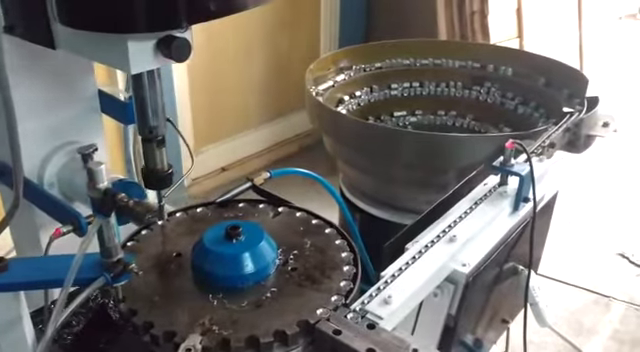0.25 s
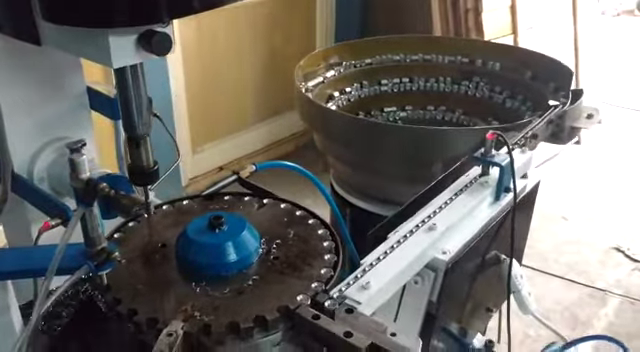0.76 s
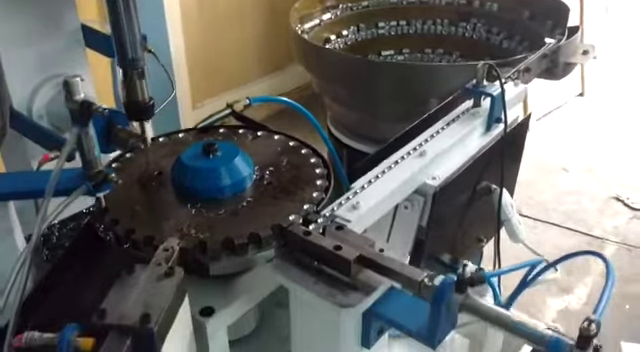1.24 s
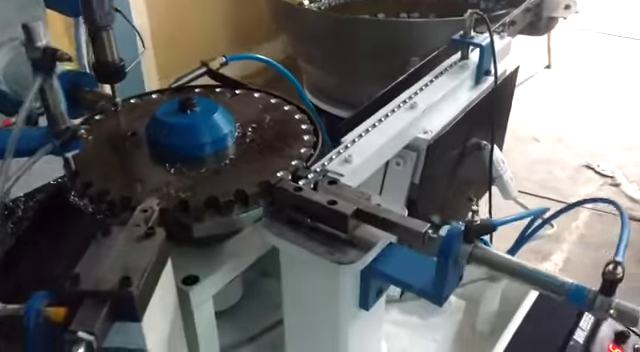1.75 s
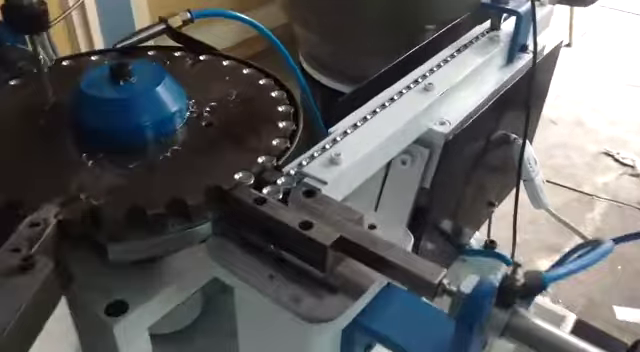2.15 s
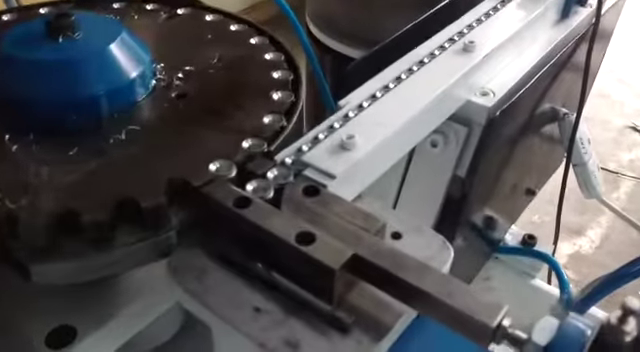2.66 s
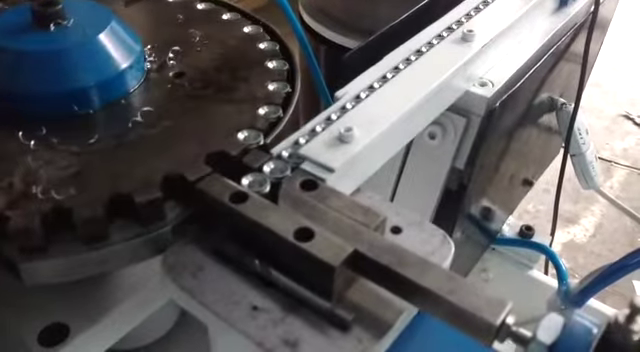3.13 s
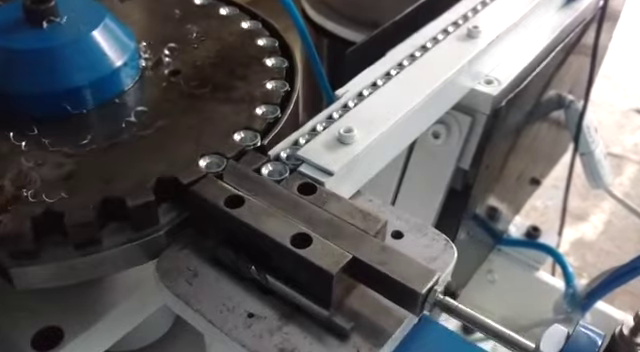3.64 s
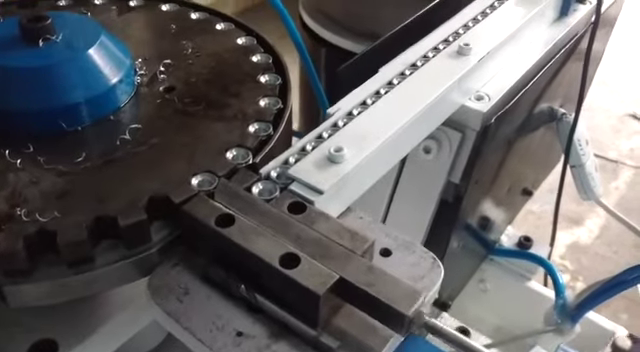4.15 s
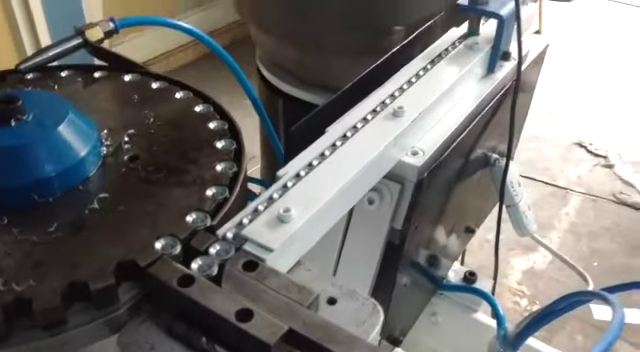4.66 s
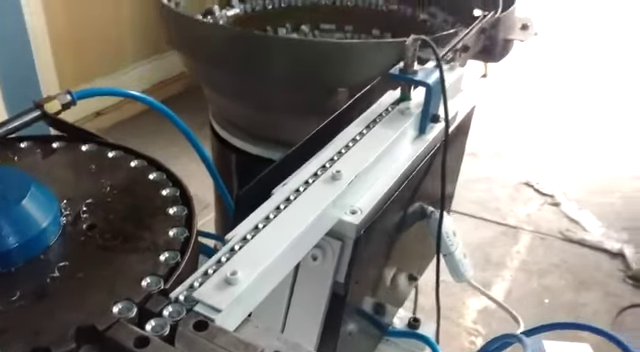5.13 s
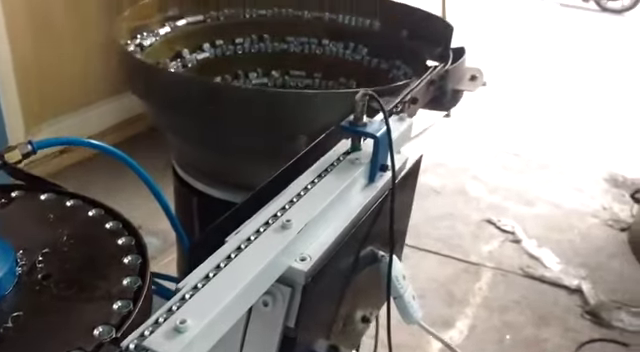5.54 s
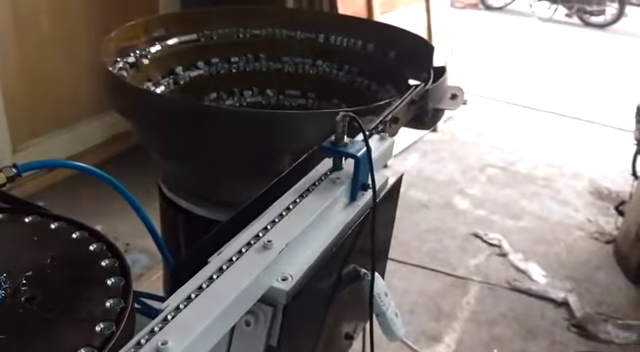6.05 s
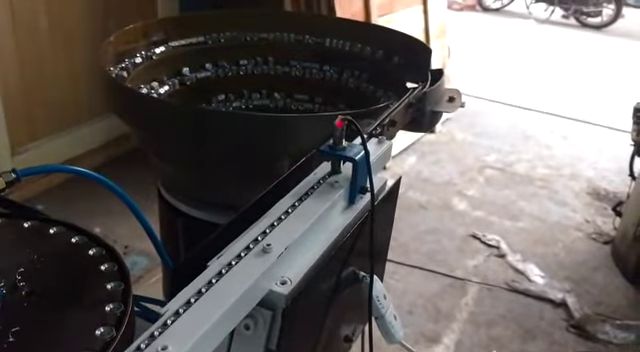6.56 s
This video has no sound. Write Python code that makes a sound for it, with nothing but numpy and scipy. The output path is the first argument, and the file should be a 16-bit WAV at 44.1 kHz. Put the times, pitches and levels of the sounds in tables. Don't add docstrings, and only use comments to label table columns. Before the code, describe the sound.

A vibrating bowl jingles continuously with tiny metal pieces, over humming motors, thin treble air leak and a compressor thumping about twelve times a second. Sharp puffs, clacks and dull frame jolts come in clusters as the table indexes. Faint very high drill squeals precede two hissing releases. The wide stereo handheld microphone ducks at every blast, then recovers, with short room reverberation.

```python
import sys
import numpy as np
from scipy import signal
from scipy.fft import rfft, irfft, next_fast_len
from scipy.io import wavfile
from scipy.ndimage import uniform_filter1d, map_coordinates

SR = 44100
rng = np.random.default_rng(int(sys.argv[2]) if len(sys.argv) > 2 else 0)


def amplitude_ratio(level_db):
    exponent = np.asarray(level_db, float) / 20
    return 10 ** exponent


def master_out(mix):
    frames = np.transpose(np.atleast_2d(mix))
    ceiling = np.clip(frames, -1, 1)
    pcm = np.round(ceiling * 32767).astype(np.int16)
    wavfile.write(sys.argv[1], SR, pcm)


N = 299880

# frequency in Hz, density in dB per Hz.
ROAR_SPECTRUM = [(20, -45), (45, -30), (100, -10.5), (200, -8), (350, -0.5), (600, -6.5), (1100, -10),
                 (1800, -11.5), (2300, -13.5), (2900, -11), (3600, -8), (5000, -46)]
RATTLE_SPECTRUM = [(700, -40), (1500, -15), (2300, -8.5), (3000, -9.5), (4000, -0.5), (5000, -1.5),
                   (6000, -3), (7500, -6.5), (9000, -13.5), (12000, -63)]
LEAK_SPECTRUM = [(5000, -52), (7000, -29.5), (8500, -6), (10000, -1.5), (12000, -4.5), (14000, -10),
                 (15800, -19)]
# frequency in Hz, width in Hz, level in dB.
BOWL_MODES = [(3115, 30, 2), (3600, 45, 0), (3899, 35, 3), (4030, 35, 0), (4293, 50, -2), (4850, 60, -2),
              (5690, 100, -4), (6120, 75, 0)]
MOTOR_MODES = [(88, 8, 1), (150, 10, 1), (167, 8, 1), (198, 10, 1), (289, 18, 3), (352, 10, 4),
               (414, 13, 5.5), (528, 8, 1.5), (550, 8, 2), (649, 10, 2.5), (729, 13, 2), (1262, 24, -3),
               (1740, 40, -3)]
# time in seconds, gain in dB.
BOWL_NEARNESS = [(0, 1), (.7, -0.5), (1.9, 1), (2.4, 0), (3.1, 2.5), (3.6, 2), (4.2, 2.5), (5.2, 2.5),
                 (5.9, 0), (6.8, 3.5)]
# start in seconds, end in seconds, roar gained in dB.
CUTS = [
    (1.697, 2.458, 2.5),
    (5.606, 5.962, 0),
]
# time in seconds, gain left in dB.
DUCKS = [
    (0, -6.5),
    (.125, -19.5),
    (.728, -13.5),
    (2.458, -16),
    (2.73, -15),
    (3.622, -14.5),
    (4.228, -10),
    (5.961, -13),
    (6.225, -12.5),
]
# turn 0 to 1, frequency in Hz, level over the roar in dB,
# half length in seconds.
CHUFFS = [
    (.235, 395, 5.5, .0045),
    (.76, 370, 2, .0035),
]
# time in seconds, peak in dB,
# 60 dB decay in seconds, hold in seconds.
PUFFS = [(.116, -7, .35, 0.029), (.7177, -8.5, 0.31, 0.039), (2.7226, -8.5, 0.3, 0.011),
         (3.316, -12.5, .3, 0.024), (3.614, -5.5, 0.4, 0.034), (4.218, -7, 0.37, 0.027),
         (6.2194, -7.5, 0.31, .0082)]
RELEASES = [
    (2.4516, -10.5, 0.99, .011),
    (5.9543, -6, 0.75, .012),
]
# frequency in Hz, density in dB per Hz.
PUFF_SPECTRUM = [(40, -27), (200, -9.5), (1000, -24.5), (2300, -11), (3000, -11), (4000, -4.5), (6000, -2),
                 (7500, -8), (10000, -10), (14000, -13.5), (15800, -20)]
RELEASE_SPECTRUM = [(1000, -35), (2600, -22), (2900, -8), (4500, -0.5), (6500, 1), (7800, -6.5),
                    (8900, -0.5), (10000, -11), (14000, -14.5), (15800, -14)]
# time in seconds, peak in dB.
JOLTS = [(.118, -12), (.248, -18), (.722, -13.5), (2.45, -29), (2.724, -14), (3.002, -15), (3.318, -20),
         (3.618, -9.5), (3.745, -14), (4.217, -12.5), (4.281, -11.5), (6.214, -19), (6.499, -20)]
# frequency in Hz, density in dB per Hz.
THUD_SPECTRUM = [(40, -16), (150, -9), (400, 1), (1200, -10.5), (1900, -11), (3000, -7), (6000, -50)]
CRACK_SPECTRUM = [(150, -31), (500, -22), (1500, -7.5), (3000, -8.5), (5000, 2.5), (8000, -4.5),
                  (12000, -19), (16000, -19)]
# time in seconds, peak in dB.
SLIDE_HITS = [
    (3.089, -10),
    (6.604, -13.5),
]
STOP_HITS = [
    (0.247, -20),
    (3.7445, -13),
]
CLAMP_HITS = [
    (3.414, -11),
]
LATCH_HITS = [
    (0.189, -3),
    (3.6925, -7),
]
# frequency in Hz, level in dB, 60 dB decay in seconds.
SLIDE_MODES = [(678, -16, 3), (1036, -6, .13), (1840, -12, .1), (2750, -10, .1), (3600, 3, .07),
               (3950, 0, .06), (4300, -1, .05), (4600, -4, .04), (6110, -9, .03)]
STOP_MODES = [(731, -1, 0.037), (853, -5, 0.1), (1870, -9, 0.11), (3600, -2, 0.057), (4230, -10, .15),
              (6100, -31, 0.075), (10200, -45, .05)]
CLAMP_MODES = [(3600, -7, .08), (3910, -3, 0.14), (6300, -5, 0.057), (8650, -1.5, 0.059)]
LATCH_MODES = [(6400, -2, .018), (7000, -3, .014), (3430, -14, .04)]
# time in seconds,
# peak in dB, part frequency in Hz, frame frequency in Hz.
PAWL_TICKS = [(.12, 1.5, 6180, 802), (2.45, 3.5, 6520, 1110), (2.559, -2.5, 5950, 725),
              (3.622, -2, 4600, 1480), (4.249, -14, 6410, 1470), (4.499, -6.5, 6370, 1340),
              (4.955, -7, 6530, 1330), (5.955, 2, 6400, 1585), (5.972, -4, 6100, 1500)]
TRACK_KNOCKS = [(.554, -16, 4120, 780), (3.065, -13, 3590, 1350), (3.693, -2, 3360, 1095),
                (3.99, -10, 3910, 1420), (4.058, -12, 4040, 1115), (4.088, -9, 4020, 1100),
                (3.312, -10, 3600, 1390), (3.326, -9, 3900, 1400), (5.585, -8.5, 3900, 960),
                (6.058, -3, 3970, 1180)]
TABLE_SEATS = [(2.2, -7.5, 3700, 757), (2.371, -5, 3780, 784), (3.005, -15.5, 4230, 976),
               (3.379, -12.5, 3550, 1470), (3.618, -9.5, 6050, 1604), (.25, -17, 4300, 1710),
               (4.287, -16, 3880, 1220), (6.501, -15, 4120, 980)]
# start in seconds, end in seconds, frequency in Hz, level in dB, swell in dB.
SQUEALS = [
    (2.15, 2.378, 12900, -35, -2),
    (5.704, 5.86, 13100, -45, 8),
]
# frequency in Hz, 60 dB decay in seconds.
HALL_DECAY = [(300, 0.96), (3000, 0.33), (12000, 0.081)]
# frequency in Hz, difference over sum in dB, lean from -1 to 1.
PORT_BALANCE = [(40, -13, -0.17), (100, -17.5, 0.55), (394, -12.5, -0.43), (1540, -1.5, -0.24),
                (2200, -5, -.5), (2700, -4.5, -0.74), (3300, -1.5, -0.44), (6000, 0, -0.48),
                (8000, -1, 0.0095), (12000, -1, 0.48)]
# frequency in Hz, phase lag in cycles.
CROSS_LAG = [(0, 0), (1240, .5), (2150, .92), (2470, 1), (2800, 1.07), (3730, 1.5), (5000, 2), (6350, 2.5),
             (7650, 3), (8900, 3.5), (10050, 4), (11200, 4.5), (12600, 5), (13800, 5.5), (16300, 6.5)]
# frequency in Hz, share 0 to 1.
CROSS_SHARE = [(100, 0.78), (500, 0.42), (1240, 0.95), (2200, 1), (2780, 0.81), (3730, 0.54), (5000, 0.62),
               (6350, 0.46), (7650, 0.6), (8900, 0.51), (10050, 1), (11200, 0.35), (12600, 0.56),
               (13800, 0.3), (15000, 0.1)]
# frequency in Hz, gain in dB.
MICROPHONE = [(12000, 1), (14000, -0.5), (15480, -2), (15700, -35)]

ROAR_DB, RATTLE_DB, LEAK_DB = -25, -23.5, -34
LEAK_FOLLOWS = 0.2
RECOVER_DB_PER_S, KNEE_DB, DUCK_S = 10.5, 2, 0.02
CRANK_HZ = 6.234
JOLT_T60_S = 0.079
SQUEAL_HZ_PER_S, SQUEAL_EDGE_S = 580, .04


def unit(x):
    return x / np.sqrt(np.mean(x ** 2) + 1e-20)


def along(points, hz, column=1):
    p = np.transpose(points)
    return np.interp(np.log(hz + 1), np.log(p[0] + 1), p[column])


def wobble(rate):
    knots = rng.standard_normal(int(N * rate / SR) + 4)
    return map_coordinates(knots, [np.arange(N) * rate / SR])


def filtered(x, response):
    m = next_fast_len(x.shape[-1] + 8192)
    return irfft(rfft(x, m) * response(np.fft.rfftfreq(m, 1 / SR)), m)[..., :x.shape[-1]]


def noise(count):
    return rng.standard_normal((2, count))


def coloured(x, spectrum):
    return filtered(x, lambda hz: amplitude_ratio(along(spectrum, hz)))


def add_at(out, start_s, sound):
    out[:, round(start_s * SR):][:, :sound.shape[1]] += sound


def peak(hz, centre_hz, width_hz):
    return 1 / np.sqrt(1 + ((hz - centre_hz) / (width_hz / 2)) ** 2)


def body(modes, hz):
    return 1 + sum(amplitude_ratio(db) * peak(hz, centre_hz, width_hz) ** 2 for centre_hz, width_hz, db in modes)


def patchy(x, depth_db):
    z = signal.stft(x, nperseg=512)[2]
    field = uniform_filter1d(rng.standard_normal(z.shape[1:]), size=6, axis=0)
    field = uniform_filter1d(field, size=10, axis=1)
    return signal.istft(z * amplitude_ratio(depth_db * unit(field)), nperseg=512)[1][:, :N]


def gain_db():
    t = np.arange(N) / SR
    s, left_db = np.transpose(DUCKS)
    last = np.maximum(np.searchsorted(s, t, side="right") - 1, 0)
    climb_db = left_db[last] + RECOVER_DB_PER_S * (t - s[last])
    rounded_db = -KNEE_DB * np.logaddexp(0, -climb_db / KNEE_DB)
    return uniform_filter1d(rounded_db, size=max(round(DUCK_S * SR), 1))


def roar_db():
    t = np.arange(N) / SR
    load_db = sum(db * (t - a) / (b - a) * (t > a) * (t < b) for a, b, db in CUTS)
    return ROAR_DB + gain_db() + load_db


def jingle(count):
    when = rng.random((count, 2))
    size = rng.exponential(size=(count, 1))
    draw = rng.standard_normal((count, 2))
    hz = 4600 * np.exp(.3 * draw[:, :1])
    life_s = .007 * np.exp(.4 * np.clip(draw[:, 1:], -2, 2))
    t = np.arange(1200) / SR
    level = amplitude_ratio(5.1 * np.minimum(size, 3.5) + along(RATTLE_SPECTRUM, hz))
    envelope = np.exp(-t / life_s) * np.minimum(t / 0.0025, 1)
    tones = level * envelope * np.sin(2 * np.pi * hz * t)
    places = (when[:, :, None] * N).astype(int) + np.arange(len(t))
    return unit(np.array([np.bincount(places[:, k].ravel(), tones.ravel())[:N] for k in (0, 1)]))


def bowl_rattle(surge):
    bed = filtered(patchy(surge * noise(N), depth_db=1.1),
                   lambda hz: amplitude_ratio(along(RATTLE_SPECTRUM, hz)) * body(BOWL_MODES, hz))
    return unit(unit(bed) + 0.38 * jingle(count=4100))


def motor_roar():
    roar = filtered(patchy(noise(N), depth_db=1.5),
                    lambda hz: amplitude_ratio(along(ROAR_SPECTRUM, hz)) * body(MOTOR_MODES, hz))
    return unit(roar * amplitude_ratio(0.83 * wobble(90) + 0.81 * wobble(400)))


def air_leak(surge):
    return unit(coloured(patchy(surge * noise(N), depth_db=3.0), LEAK_SPECTRUM))


def din():
    s, db = np.transpose(BOWL_NEARNESS)
    near_db = np.interp(np.arange(N) / SR, s, db)
    rattle_db = RATTLE_DB + near_db + gain_db()
    leak_db = LEAK_DB + LEAK_FOLLOWS * near_db + gain_db()
    surge = amplitude_ratio(.6 * wobble(25) + .6 * wobble(200))
    mix = amplitude_ratio(rattle_db - 4.0) * bowl_rattle(surge)
    mix += amplitude_ratio(roar_db() - 1) * motor_roar()
    return mix + amplitude_ratio(leak_db - 3.0) * air_leak(surge)


def cross(hz):
    lag = np.interp(hz, *np.transpose(CROSS_LAG))
    return np.clip(along(CROSS_SHARE, hz), 0, 1) * np.exp(-2j * np.pi * lag)


def compressor():
    turn = np.arange(N) / SR * CRANK_HZ
    thumps = np.zeros(N)
    for at, hz, db, half_s in CHUFFS:
        t = ((turn - at + .5) % 1 - .5) / CRANK_HZ
        pulse = np.exp(-(t / half_s) ** 2 / 2) * np.cos(2 * np.pi * hz * t)
        thumps += amplitude_ratio(db + 0.42 * wobble(4)) * pulse
    thumps *= amplitude_ratio(roar_db())
    return np.array([filtered(thumps, cross), thumps])


def valves():
    out, t = np.zeros((2, N + SR)), np.arange(SR // 2) / SR
    opened = np.maximum(t - .012, 0)
    kinds = [(PUFFS, PUFF_SPECTRUM, 5450, .12, .078), (RELEASES, RELEASE_SPECTRUM, 3600, .4, .16)]
    for events, spectrum, port_hz, rise_share, shut_s in kinds:
        for s, db, t60, hold in events:
            jet = filtered(noise(len(t)), lambda hz: amplitude_ratio(along(spectrum, hz))
                           * (1 + 1.14 * peak(hz, port_hz, width_hz=1350)))
            flow = 0.12 * np.minimum(t / 0.018, 1) + 1 - np.exp(-opened / (rise_share * hold))
            fall_db = -60 * np.maximum(opened - hold, 0) / t60
            fall_db -= 60 * np.maximum(opened - shut_s, 0) / 2.1
            add_at(out, s - .014, amplitude_ratio(db - 15 + fall_db) * flow * unit(jet))
    return out[:, :N] * amplitude_ratio(1.2 * wobble(350))


def jolts():
    out, t = np.zeros((2, N + SR)), np.arange(SR // 5) / SR
    for s, db in JOLTS:
        burst = unit(coloured(noise(len(t)), THUD_SPECTRUM))
        add_at(out, s, amplitude_ratio(db - 13.0 - 60 * t / JOLT_T60_S) * (1 - np.exp(-t / 0.00047)) * burst)
    return out[:, :N]


def ring(modes, t, crack_db):
    tones = 0
    for hz, db, t60 in modes:
        drift = 1.6e-5 * hz * np.cumsum(noise(len(t)), axis=1)
        drift = drift + [[0], [2 * np.pi * rng.random()]]
        tones = tones + amplitude_ratio(db - 60 * t / t60) * np.sin(2 * np.pi * hz * t + drift)
    crack = unit(coloured(noise(len(t)), CRACK_SPECTRUM))
    crack = crack * (amplitude_ratio(-60 * t / 0.027) + 0.5 * amplitude_ratio(-60 * t / 0.067))
    return (1 - np.exp(-t / 0.0014)) * (tones + amplitude_ratio(crack_db) * crack)


def knocks():
    out, t = np.zeros((2, N + SR)), np.arange(SR * 3 // 4) / SR
    for hits, modes, crack_db in [(SLIDE_HITS, SLIDE_MODES, -4), (STOP_HITS, STOP_MODES, 3),
                                  (CLAMP_HITS, CLAMP_MODES, -6), (LATCH_HITS, LATCH_MODES, -6)]:
        for s, db in hits:
            add_at(out, s, amplitude_ratio(db - 10.5) * ring(modes, t, crack_db))
    t = t[:SR // 5]
    for ticks, frame_db, crack_db in [(PAWL_TICKS, -18, -3), (TRACK_KNOCKS, -16, -3.5), (TABLE_SEATS, -1.5, -7)]:
        for s, db, part_hz, frame_hz in ticks:
            part = [(part_hz, -2, .05), (0.99 * part_hz, -8, .04)]
            frame = [(frame_hz, frame_db, .06), (1.2 * frame_hz, frame_db, .05)]
            add_at(out, s, amplitude_ratio(db - 16.5) * ring(part + frame, t, crack_db))
    return out[:, :N]


def hall(x):
    hz, t, z = signal.stft(noise(SR // 2), SR, nperseg=256)
    decay = amplitude_ratio(-60 * t / along(HALL_DECAY, hz)[:, None])
    tail = signal.istft(z * decay, SR, nperseg=256)[1]
    return signal.fftconvolve(x, tail / np.linalg.norm(tail[0]), axes=1)[:, :N]


def squeal():
    t, out = np.arange(N) / SR, 0
    for a, b, hz, db, swell_db in SQUEALS:
        pitch_hz = hz + SQUEAL_HZ_PER_S * np.clip(t - a, 0, b - a) + 50 * wobble(300)
        phase = 2 * np.pi * np.cumsum(pitch_hz) / SR
        edge = np.clip(np.minimum(t - a, b - t) / SQUEAL_EDGE_S + .5, 0, 1) ** 2
        level_db = db + swell_db * np.clip((t - a) / (b - a), 0, 1) + 4.9 * wobble(120)
        out = out + amplitude_ratio(level_db) * edge * np.sin(phase)
    return out * amplitude_ratio([[0], [-8]])


def ports(pair):
    def spread(hz):
        lean = np.clip(along(PORT_BALANCE, hz, column=2), -1, 1)
        return amplitude_ratio(along(PORT_BALANCE, hz)) * [lean, np.sqrt(1 - lean ** 2)]
    side = filtered(pair, spread).sum(0)
    return np.array([pair[0] + side, pair[0] - side])


def scene():
    steady = din()
    chuffs = compressor()
    puffs = valves()
    blows = jolts() + knocks()
    return ports(steady + puffs + blows + amplitude_ratio(-5) * hall(blows)) + chuffs + squeal()


def roll_off(x):
    return signal.sosfilt(signal.butter(12, 15700, fs=SR, output="sos"), x)


def record(dry):
    heard = coloured(dry, MICROPHONE)
    wide = heard - filtered(heard[::-1], cross)
    limited = wide / (1 + np.abs(wide / .95) ** 12) ** (1 / 12)
    return roll_off(limited)


dry = scene()
out = record(dry)
master_out(out)
```